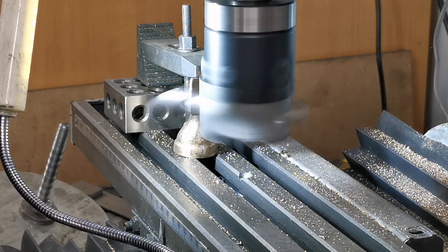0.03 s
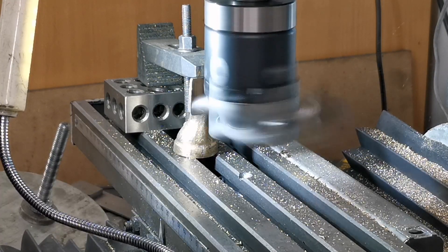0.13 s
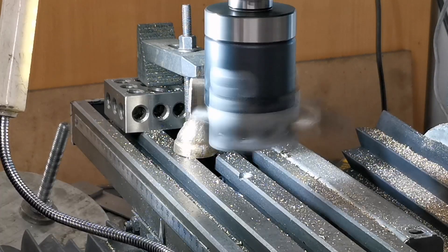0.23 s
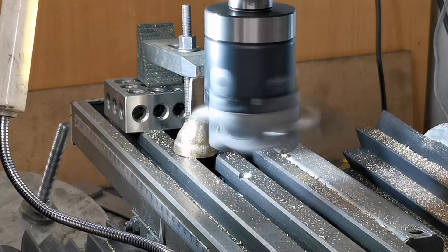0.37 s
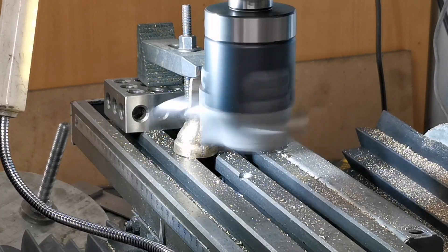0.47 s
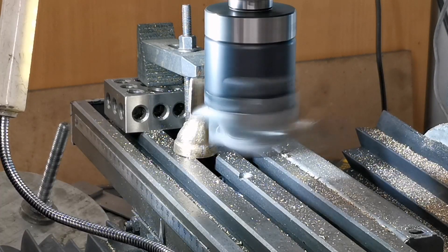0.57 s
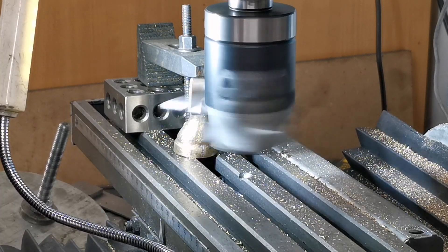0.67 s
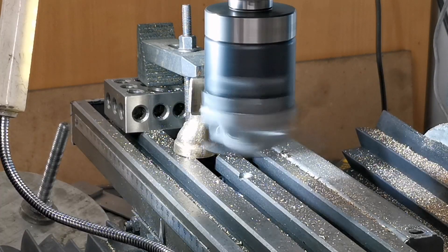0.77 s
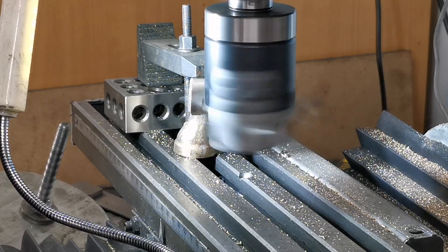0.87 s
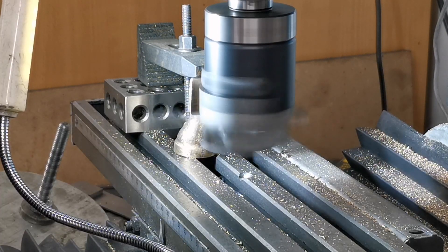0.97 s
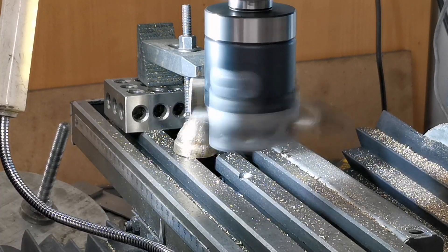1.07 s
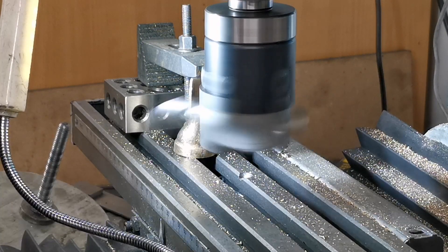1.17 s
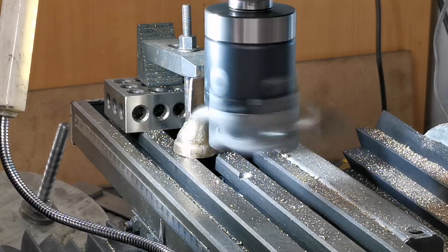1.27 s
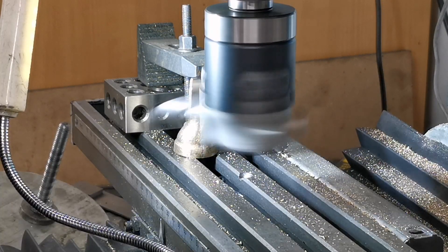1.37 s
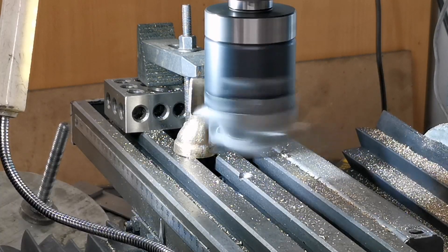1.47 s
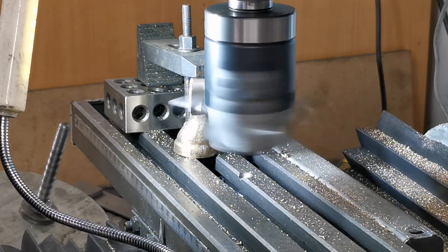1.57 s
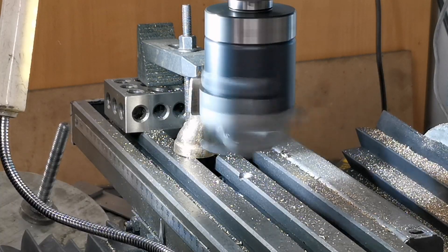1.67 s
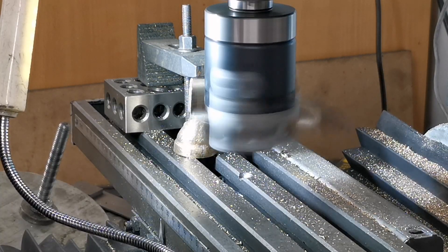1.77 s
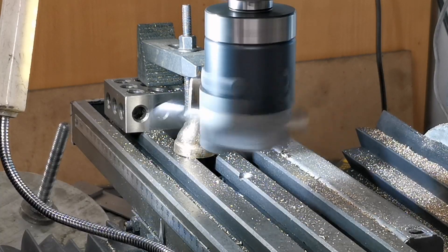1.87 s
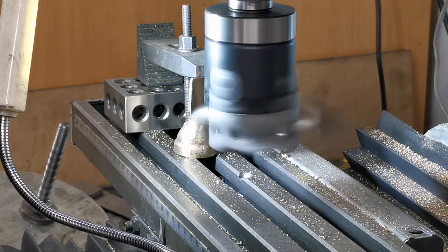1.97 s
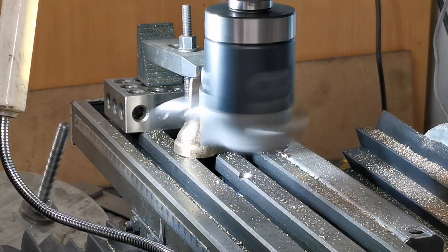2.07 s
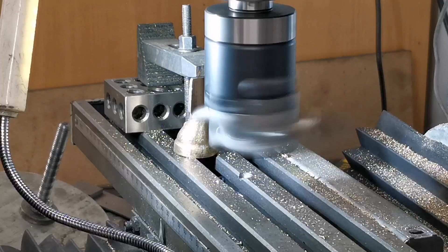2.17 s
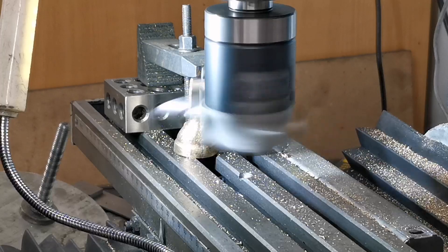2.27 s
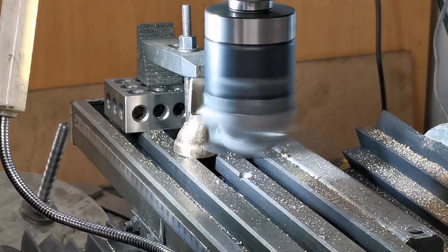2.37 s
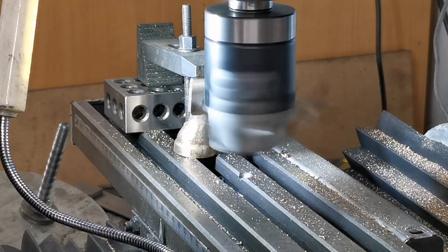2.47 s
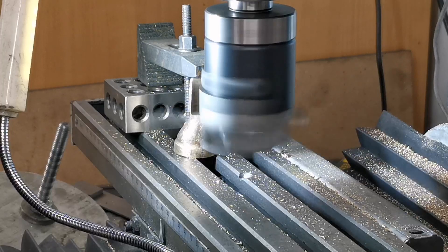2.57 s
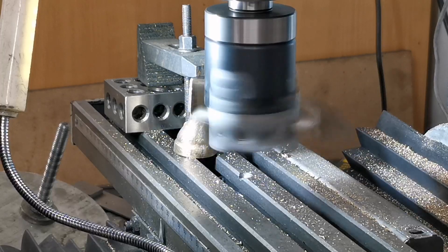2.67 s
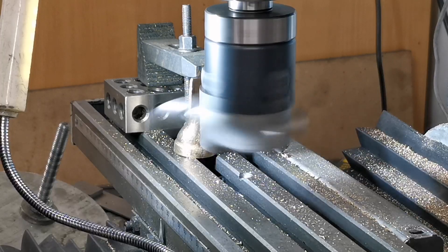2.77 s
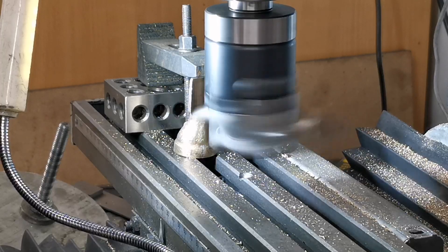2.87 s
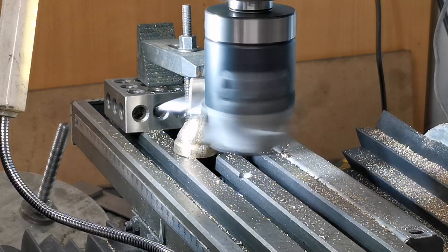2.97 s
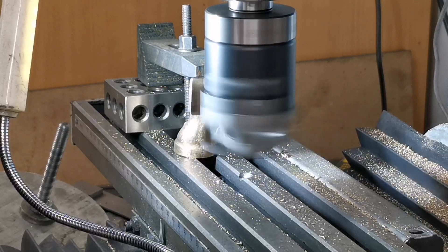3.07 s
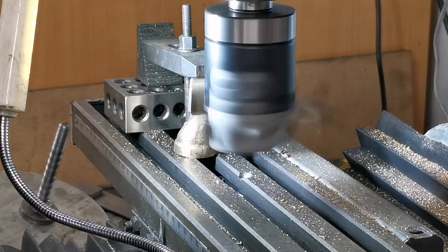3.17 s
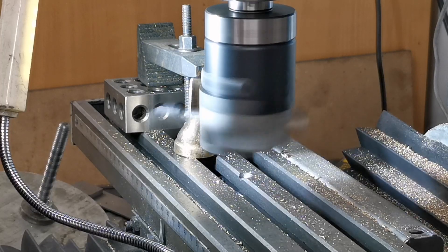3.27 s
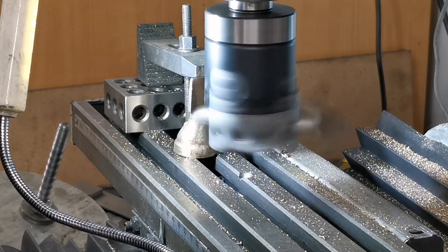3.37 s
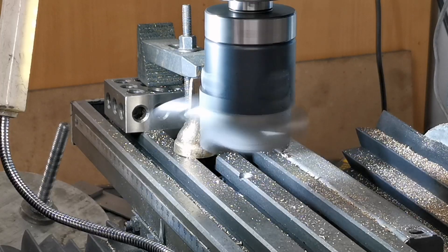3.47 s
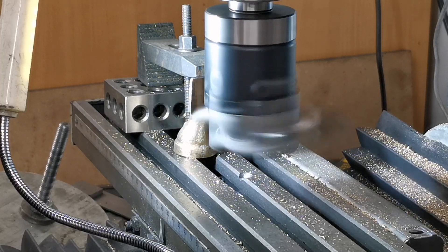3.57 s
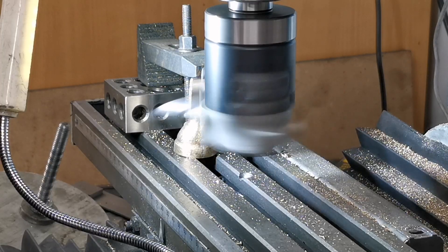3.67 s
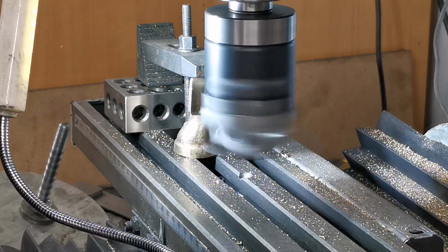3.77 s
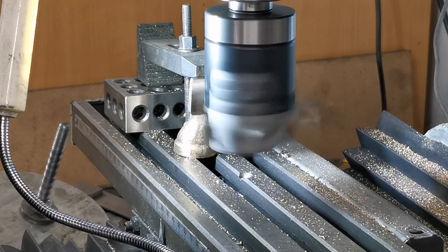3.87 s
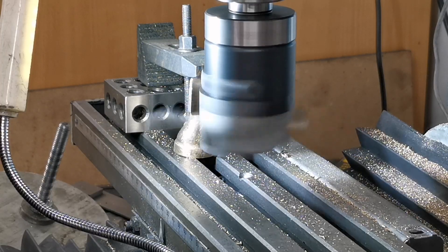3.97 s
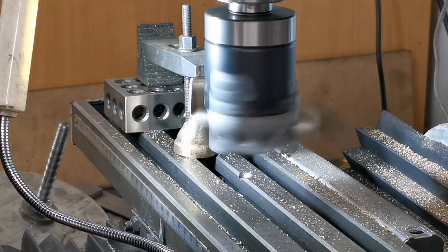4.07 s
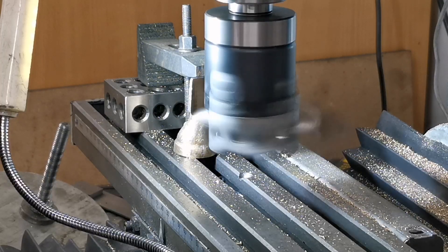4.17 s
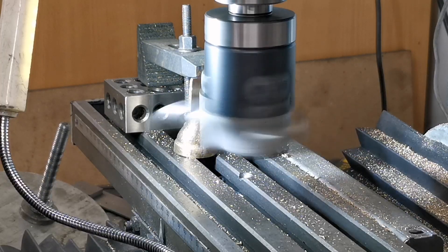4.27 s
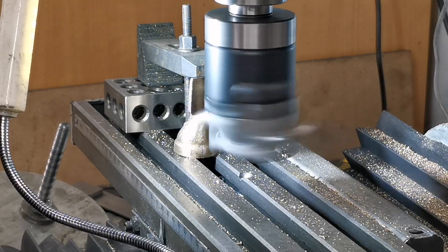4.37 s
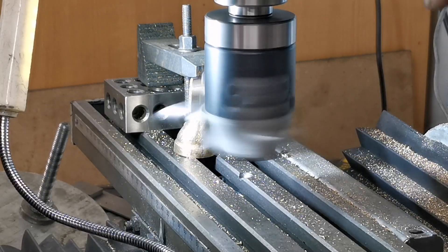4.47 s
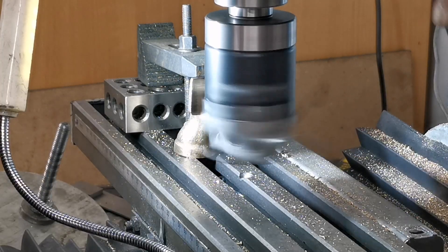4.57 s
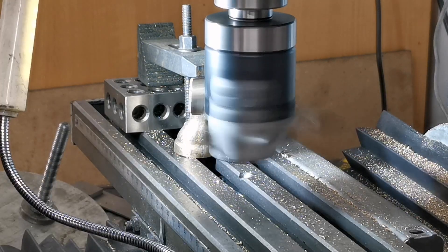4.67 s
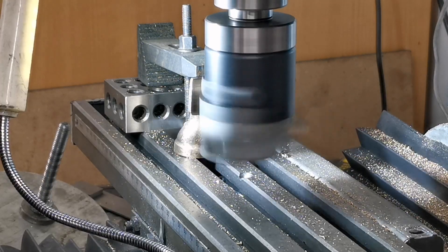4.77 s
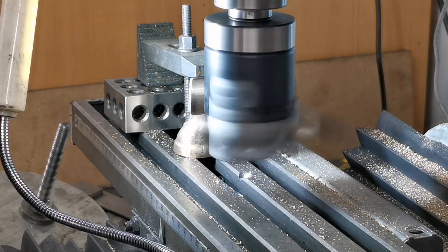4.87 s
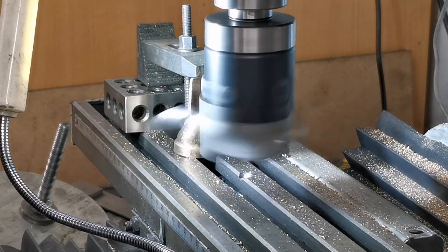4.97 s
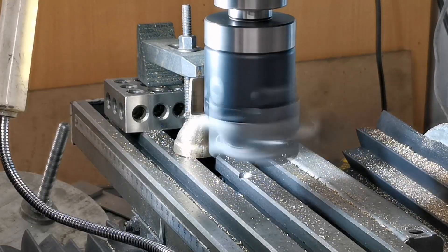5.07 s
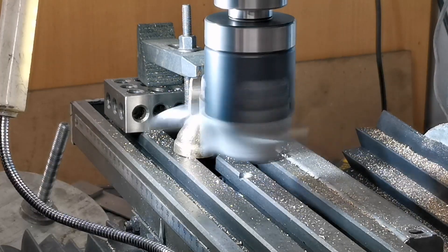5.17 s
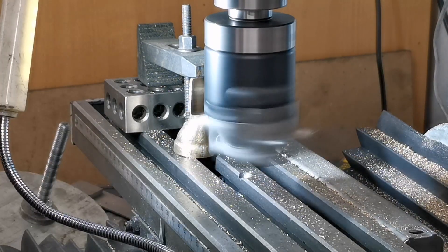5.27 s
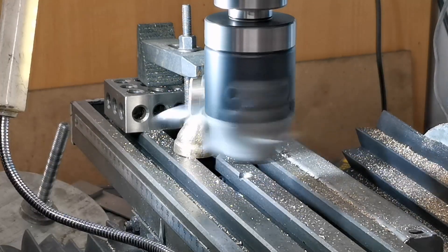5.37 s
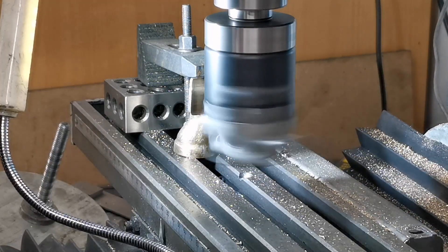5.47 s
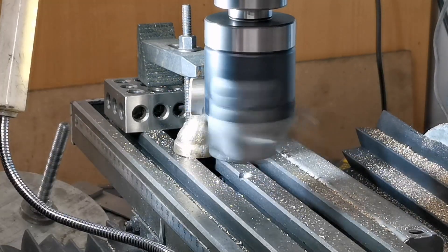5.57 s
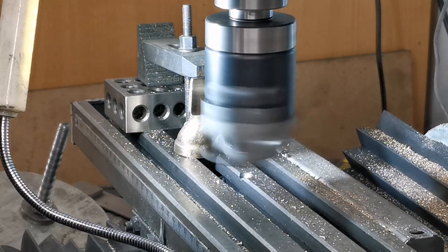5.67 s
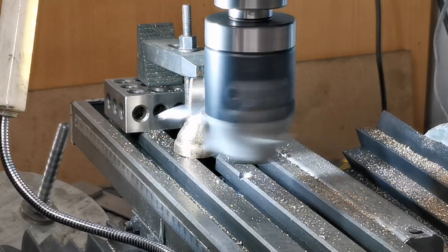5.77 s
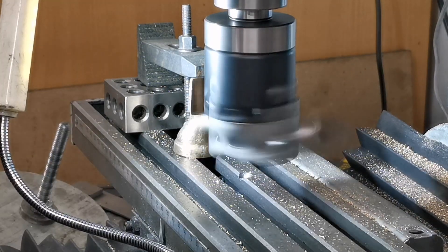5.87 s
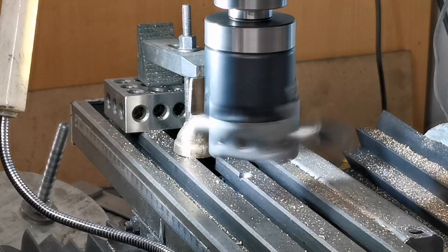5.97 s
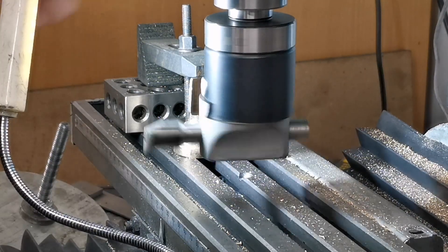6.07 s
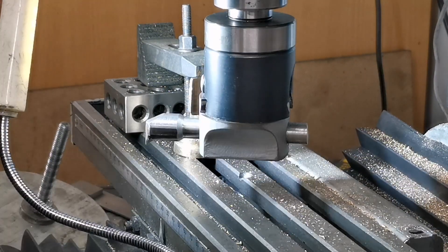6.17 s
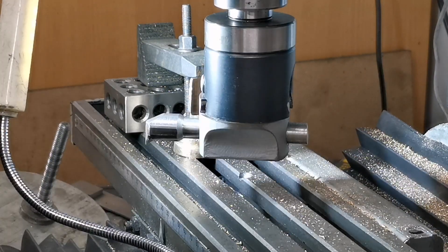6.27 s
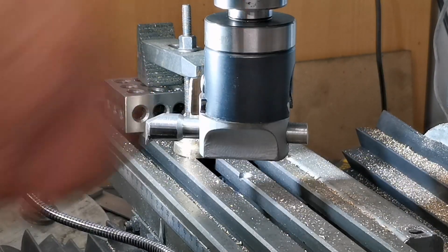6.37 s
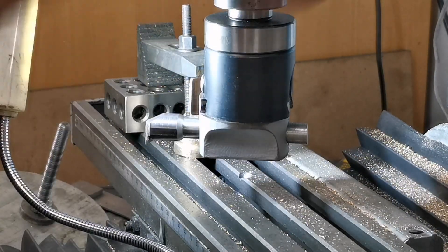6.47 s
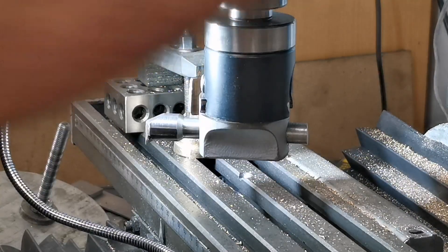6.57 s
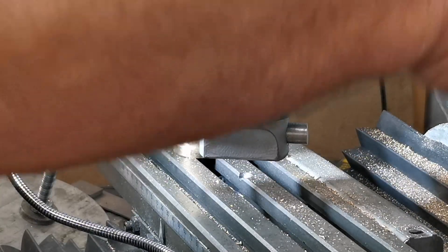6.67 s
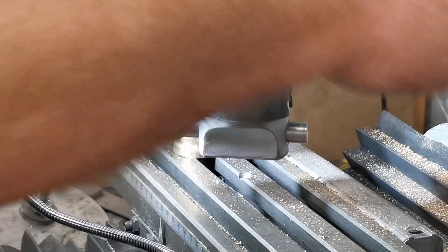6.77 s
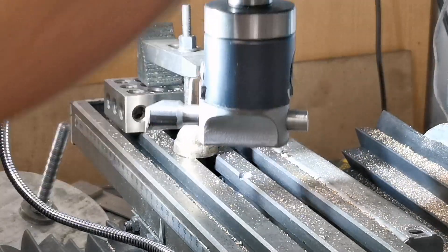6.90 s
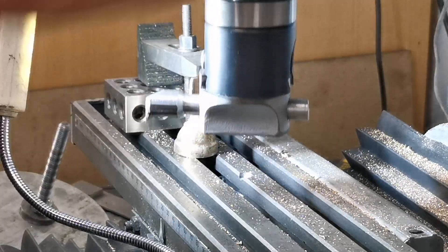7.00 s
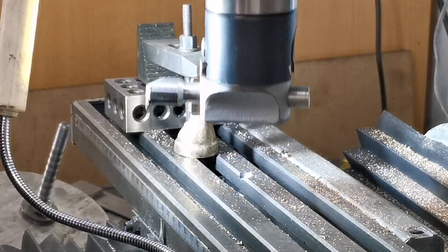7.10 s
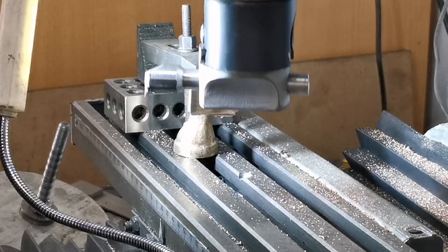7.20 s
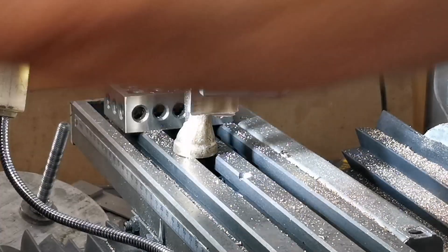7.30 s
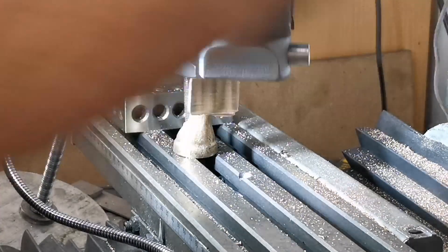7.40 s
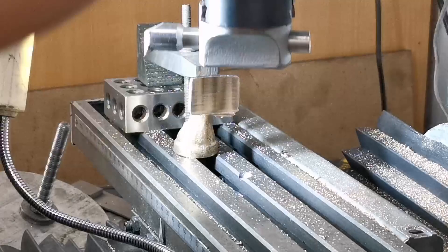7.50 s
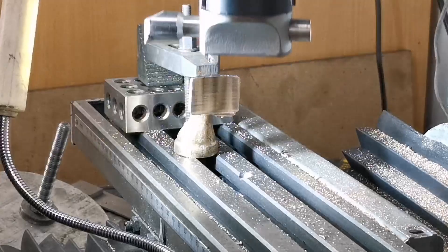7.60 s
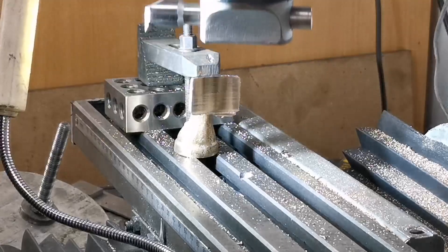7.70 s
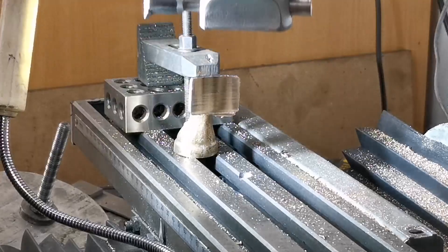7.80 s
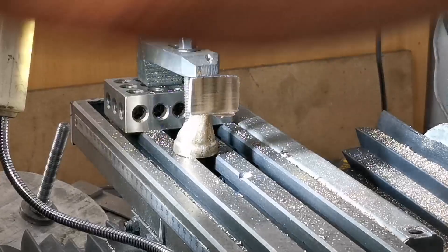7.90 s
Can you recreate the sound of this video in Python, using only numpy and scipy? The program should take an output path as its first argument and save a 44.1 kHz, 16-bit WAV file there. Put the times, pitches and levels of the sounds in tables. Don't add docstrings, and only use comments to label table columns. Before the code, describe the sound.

A milling machine heard very close in stereo, in a small workshop with short, bright reflections and quiet air. From 0 to 0.4 s a boring head takes heavy, gritty bites with ringing metal, about fifteen a second. Until about 3.7 s it settles into a steady finishing cut: each turn a short crunchy tear with clamp knock, bar ring and high tip squeal, loosening slightly over time. Bites weaken and end at 4.1 s. Then faint, uneven high ticks graze over throbbing gear rattle and thin, very high whine. At 5.73 s a switch clacks loudly; gears chatter while coasting. At 6.19 s the brake thumps, with softening knocks and a faint high squeak to 6.4 s. Near silence follows. At 6.9 s a lever slips and snaps. From 7 s to the end, near 8 s, the head rises with low rack rumble, rustle, soft sliding hiss and irregular small tooth knocks.

```python
import sys
import numpy as np
from scipy import signal
from scipy.fft import rfft, irfft, next_fast_len
from scipy.io import wavfile
from scipy.ndimage import uniform_filter1d

SR = 44100
rng = np.random.default_rng(int(sys.argv[2]) if len(sys.argv) > 2 else 0)


def generate_wav(sig):
    pcm = np.round(np.clip(np.atleast_2d(sig).T, -1, 1) * 32767).astype(np.int16)
    wavfile.write(sys.argv[1], SR, pcm)


def voltage_ratio(level):
    return 10 ** (np.asarray(level, float) / 20)


N = 350154
T = np.arange(N) / SR


def evened(x):
    return x / np.sqrt(np.mean(x ** 2) + 1e-20)


def read(points, hz):
    f, value = np.transpose(points)
    return np.interp(np.log(hz + 1), np.log(f + 1), value)


def curves(rows):
    s, *columns = np.transpose(rows)
    gate = np.clip(np.minimum(T - s[0] + 1e-3, s[-1] - T) * 50, 0, 1)
    return gate, [np.interp(T, s, c) for c in columns]


def colour(x, points):
    log_gain = np.log(voltage_ratio(read(points, abs(np.fft.fftfreq(4096, 1 / SR)))))
    taps = np.fft.ifft(np.exp(np.conj(signal.hilbert(log_gain)))).real[:2048]
    return signal.oaconvolve(x, taps / np.linalg.norm(taps))[:len(x)]


def ring(x, modes):
    out = np.zeros(len(x))
    for hz, width, db in modes:
        r = np.exp(-np.pi * abs(width) / SR)
        c = r * np.cos(2 * np.pi * hz / SR)
        level = voltage_ratio(db) * np.sqrt(2 * (1 - r * r))
        out += level * signal.lfilter([1, -c], [1, -2 * c, r * r], x)
    return out


def wobble(hz):
    return evened(ring(rng.standard_normal(N), [(0, hz, 0)]))


def bursts(times, dbs, rise, length, alike, hold=0):
    t = np.arange(4000) / SR
    out = np.zeros(N + 4000)
    noise, grit = rng.standard_normal((len(times) + 1, len(t), 2)).transpose(2, 0, 1)
    noise = noise * voltage_ratio(2.65 * evened(uniform_filter1d(grit, size=40)))
    alike = np.clip(alike, 0, 1)

    def shape(span):
        return np.minimum(t / rise, 1) ** 2 * np.exp(-np.maximum(t - rise - hold, 0) / abs(span))

    usual = shape(np.median(length))
    pattern = usual * noise[0]
    for _ in range(3):
        pattern = irfft(np.exp(1j * np.angle(rfft(pattern))))
        pattern *= usual / np.sqrt(uniform_filter1d(pattern ** 2, size=80) + 1e-12)
    pattern *= np.linalg.norm(usual) / np.linalg.norm(pattern)
    for s, db, span, fresh in zip(times, dbs, length * np.ones(len(times)), noise[1:]):
        at = max(round((s - rise / 2) * SR), 0)
        mixed = alike * pattern + np.sqrt(1 - alike ** 2) * shape(span) * fresh
        out[at:at + len(t)] += voltage_ratio(db) * mixed
    return out[:N]


def pushes(times, dbs, length):
    train = np.zeros(N)
    train[np.round(times * SR).astype(int)] = voltage_ratio(dbs)
    pulse = np.diff(np.hanning(round(length * SR) + 2)) * length * SR
    return signal.oaconvolve(train, pulse)[:N]


def blows(rows, body):
    s, db, length = np.transpose(rows)
    return colour(bursts(s, db - 12, rise=.0015, length=length, alike=0.69), body)


def whistle(hz, width):
    phase = 2 * np.pi * np.cumsum(hz + width * wobble(hz=157)) / SR
    return np.sin(phase) * voltage_ratio(3.6 * wobble(hz=25) + 4.0)


# (frequency [Hz], likeness [0-1])
LIKENESS = [(25, .55), (60, .85), (150, .995), (550, .97), (1650, .75), (4000, .2), (8000, .05)]


def diffuse(db, size):
    hz = np.fft.rfftfreq(512, 1 / SR)[:, None]
    t = np.arange(size // 128 + 5) * 128 / SR
    a, b, c, d = rng.standard_normal((len(t), len(hz), 4)).T
    same = np.clip(read(LIKENESS, hz), -1, 1)
    left = a + 1j * b
    right = same * left + np.sqrt(1 - same ** 2) * (c + 1j * d)
    z = np.array([left, right]) * voltage_ratio(db(hz, t))
    return signal.istft(z, nperseg=512, noverlap=384)[1][:, :size]


# (time [s], peak [dB])
HEAVY = [(.003, -29), (0.0216, -20), (0.0846, -20.5), (0.1495, -20.5), (0.214, -20), (0.2775, -20),
         (0.344, -20.5), (0.407, -33)]
# (time [s], peak [dB], relative tip squeal [dB])
FIRST_BITE = (.376, -26, -12.5)
# (time [s], peak [dB], relative tip squeal [dB])
BITES = [(0.44, -20.5, -10), (0.504, -21, -9), (0.567, -21, -10), (0.633, -20.5, -12.5),
         (0.697, -21, -13.5), (0.759, -21, -15), (0.825, -20.5, -10), (0.892, -21, -14.5),
         (0.958, -21, -14.5), (1.023, -20.5, -11.5), (1.088, -21.5, -14), (1.152, -21, -14),
         (1.216, -21, -13), (1.282, -21, -17), (1.345, -21.5, -14), (1.409, -22, -10), (1.475, -21.5, -16),
         (1.537, -21, -15), (1.602, -24, -14), (1.667, -23, -11.5), (1.731, -22.5, -14),
         (1.794, -23.5, -14), (1.86, -22, -14), (1.924, -23.5, -11.5), (1.989, -23.5, -13),
         (2.054, -23.5, -13.5), (2.119, -24, -9.5), (2.184, -23, -16), (2.248, -23.5, -16.5),
         (2.313, -24, -11.5), (2.377, -24, -10), (2.444, -23, -13), (2.508, -23, -15.5),
         (2.571, -22.5, -14), (2.636, -22.5, -12.5), (2.702, -23.5, -10), (2.766, -22, -12),
         (2.828, -22, -14.5), (2.892, -23.5, -11), (2.957, -22, -12), (3.019, -22, -11.5),
         (3.083, -23, -12), (3.145, -22, -15.5), (3.21, -24, -17), (3.276, -23.5, -11),
         (3.34, -23.5, -15.5), (3.404, -23.5, -13), (3.469, -23.5, -12.5), (3.534, -23.5, -13),
         (3.598, -24, -15), (3.663, -23, -15), (3.729, -25.5, -18), (3.793, -25.5, -21.5),
         (3.854, -27, -20), (3.919, -28, -15), (3.981, -27, -16.5), (4.046, -27, -20.5),
         (4.11, -31.5, -15.5)]
# (time [s], edge [dB], contact [dB], clamp ring [dB], crunch [dB])
CUT = [(.37, -2, -0.5, -34, 3), (.5, -3.5, -1, -35, 2), (1.3, -2.5, -2, -28.5, -0.5),
       (1.6, -2.5, -2, -23.5, -1), (2.3, -3.5, 0, -23.5, 0.5), (2.8, -4, -2, -25.5, -4.5),
       (3.6, -3, -3.5, -31.5, -5.5), (3.78, -3.5, -10, -21, -2.5), (3.93, -2.5, -8.5, -19, 2.5),
       (4.05, -4.5, -8.5, -18, 2.5), (4.12, -7, -16, -26, 11)]
# (table thump [dB], part knock [dB], tip squeal [dB], clamp ring [dB], crunch [dB])
HEAVY_SHARE = (-32.5, -14.5, -16, -27.5, -2.5)
LATER_SHARE = (-26, -20.5, -9.5, -2.5, 0.25)
# (bite [dB], thump [dB], knock [dB], squeal [dB])
SCATTER_DB = (.3, .9, 3, .6)


def cut():
    later_s, peak_db, squeal = np.transpose([FIRST_BITE] + list(BITES))
    at, *columns = np.transpose(CUT)
    edge, contact, clamp, crunch = (np.interp(later_s, at, c) for c in columns)
    later_db = peak_db + edge
    squeal = 0.58 * (squeal - np.median(squeal)) + 0.36 * contact
    later = np.array([contact, 0 * later_db, squeal, clamp, crunch]).T + LATER_SHARE
    heavy_s, heavy_db = np.transpose(HEAVY)
    shares = np.r_[np.tile(HEAVY_SHARE, (len(HEAVY), 1)), later].T
    luck = (rng.standard_normal((shares.shape[1], len(SCATTER_DB))) * SCATTER_DB).T
    s = np.r_[heavy_s, later_s]
    db = np.r_[heavy_db, later_db] + luck[0]
    return s, db, *(shares[:3] + luck[1:]), *shares[3:]


# (frequency [Hz], width [Hz], level [dB])
TABLE = [(145.3, 39.6, -2), (214, 28.4, -9), (290.5, 35, -8)]
CLAMP = [(463.7, 23, 7), (343, 87, -18.5)]
PART = [(786, 4.7, -29.5), (934, 23, -0.5), (1095, 51, -1.5), (1411, 19, -8), (1614, 18, -10.5),
        (1867, 120, 3.5)]
BAR = [(2290, 20, -6), (2325, 19, -12), (2372, 20, -2), (3170, 40, -2), (3320, 80, -7), (3565, 40, -9)]
TIP = [(6166, 71, -19), (7430, 28, -7), (7556, 46, -1), (7920, 38, -9), (9940, 62, -13.5),
       (11400, 150, -28)]
# (frequency [Hz], width [Hz], level [dB])
CRUNCH = [(4840, 180, -0.5), (4470, 320, -3), (3956, 130, -3.5)]
SING = [(7349, 38, -6)]
STEM = [(3166, 20, -14), (2371, 14, -22)]
# (frequency [Hz], level [dB per Hz])
SHEAR = [(120, -29.5), (200, -4.5), (1870, -2.5), (2110, -20), (2330, 8), (2850, -9.5), (3230, -6.5),
         (5200, -29), (6760, -35.5), (11400, -120)]
RUB = [(3060, -51.5), (5200, -7.5), (6900, -8.5), (7580, -0.5), (8680, -13), (12200, -17), (13300, -33),
       (16000, -12)]


def bites():
    s, db, thump, knock, squeal, clamp, crunch = cut()
    chip = bursts(s - .001, db - 4.5, rise=.004, hold=0.004, length=0.0047, alike=0.85)
    chip += bursts(s + .004, db - 14.0, rise=.006, length=0.033, alike=0.95)
    when, size = rng.random((len(s), 3, 2)).T
    late = .007 + (.032 - .007) * when
    strike_db = db - 11 - 9 * when - 7 * size
    chip += bursts((s + late).ravel(), strike_db.ravel(), rise=.001, length=.0017, alike=.1)
    knocks = bursts(s - .002, db + knock, rise=0.00407, hold=0.0014, length=0.003, alike=0.93)
    rubs = bursts(s - .001, db + squeal, rise=0.0039, hold=0.001, length=0.0086, alike=0.82)
    heavy = slice(len(HEAVY))
    chip += bursts(s[heavy] - .007, db[heavy] - 7, rise=.002, length=.004, alike=.3)
    singing = bursts(s[heavy], db[heavy] - 7.0, rise=0.0014, hold=0.013, length=0.0066, alike=0.29)
    crunches = bursts(s - .001, db - 4.5 + crunch, rise=.003, hold=0.0017, length=0.013, alike=0.15)
    push = pushes(s - .003, db + thump, length=0.0027)
    table = sum(ring(ring(push, [mode]), [mode]) for mode in TABLE)
    sound = voltage_ratio(-25.0) * table
    sound += voltage_ratio(-12.5) * ring(pushes(s - .002, db + clamp, length=0.0011), CLAMP)
    sound += voltage_ratio(-0.5) * ring(knocks, PART)
    sound += voltage_ratio(-8.5) * ring(chip, BAR)
    sound += voltage_ratio(-3.5) * ring(rubs, TIP)
    sound += voltage_ratio(-13) * ring(crunches, CRUNCH)
    sound += ring(singing, SING)
    sound += ring(pushes(s + .003, db + 3 * s, length=.00015), STEM)
    sound += voltage_ratio(-6.5) * colour(chip, SHEAR) + voltage_ratio(-2.0) * colour(rubs, RUB)
    return signal.lfilter(*signal.iirnotch(5380, 14, SR), sound)


# (time [s], gear noise [dB], drive whine [dB])
SPINDLE = [(0, -52, -59), (.4, -50.5, -72), (2, -52, -72), (4, -52.5, -75), (4.3, -52, -70), (5, -52, -63),
           (5.7, -51, -70), (5.99, -54, -68), (6.03, -56.5, -71.5), (6.07, -59, -95), (6.18, -58, -99),
           (6.35, -90, -105)]
# (time [s], frequency [Hz])
QUILL = [(0, 910), (.4, 760), (1.4, 760), (2, 820), (3.9, 795), (4.2, 770), (4.4, 638), (4.68, 850),
         (4.95, 796), (5.3, 864), (5.7, 955), (5.9, 890), (6.35, 828)]
# (frequency [Hz], level [dB per Hz])
GEARS = [(35, -52), (60, -24), (250, -18), (480, -6), (1060, -3), (1620, -2), (2200, -4), (2400, -11.5),
         (3500, -17), (8710, -11.5), (9570, -16), (12100, -27), (16000, -10.5)]
# (frequency [Hz], width [Hz], level [dB])
HOUSING = [(490, 14, -11), (544, 9.5, -3), (625, 9.6, 4.5), (742.4, 13, 3.5), (821.8, 14.5, 3),
           (861, 16, -0.5), (905.6, 17, 3.5), (1246, 24, 4.5), (1108, 28.8, -20), (1552, 27, 6.5),
           (1618, 22, 7.5), (1720, 30, -10.5), (2152, 25, 2), (9270, 45, -4)]
WHINE = [(15530, 8, -4), (15655, 4, -5.5), (15520, 18, 8), (15330, 250, 1.5)]
# (time [s], level [dB])
COAST = [(5.8, -75), (5.88, -61), (6.02, -52.5), (6.1, -61), (6.19, -74)]
# (frequency [Hz], width [Hz], level [dB])
COAST_MODES = [(534, 26, -3), (890, 30, 1), (1130, 30, -6), (2135, 26, -7)]


def spindle():
    gate, (gear_db, whine_db) = curves(SPINDLE)
    best_hz = curves(QUILL)[1][0]
    rattle = rng.standard_normal(N) * voltage_ratio(1.11 * wobble(hz=60.5) + 0.32 * np.sin(2 * np.pi * 11.0 * T))
    housing = ring(rattle, HOUSING[7:])
    for mode in HOUSING[:7]:
        favour_db = 11 * np.exp(-((mode[0] - best_hz) / 55) ** 2)
        housing += voltage_ratio(favour_db) * ring(rattle, [mode])
    gears = voltage_ratio(-3.5) * evened(housing) + voltage_ratio(-2) * evened(colour(rattle, GEARS))
    whine = evened(ring(rng.standard_normal(N), WHINE))
    coasting, (coast_db,) = curves(COAST)
    chatter = evened(ring(rattle[::-1], COAST_MODES))
    gears = gears + coasting * voltage_ratio(coast_db - gear_db) * chatter
    return gate * (voltage_ratio(gear_db) * gears + voltage_ratio(whine_db - 0.5) * whine)


# (frequency [Hz], level [dB per Hz])
AIR = [(18, -8.5), (34, -2), (55, 4.5), (93, -19), (2230, -35), (7620, -30), (11600, -36), (14000, -30.5)]


def shop_air():
    return voltage_ratio(-70) * evened(diffuse(lambda hz, t: read(AIR, hz) + 0 * t, size=N))


# (time [s], peak [dB])
GRAZES = [(4.173, -45), (4.2397, -46), (4.3037, -45), (4.3673, -40), (4.431, -48), (4.4957, -41),
          (4.562, -42), (4.626, -58), (4.691, -41.5), (4.7553, -41), (4.8188, -51), (4.8852, -61),
          (4.948, -62.5), (5.0154, -47.5), (5.0797, -49), (5.1441, -50), (5.2069, -53), (5.2703, -53),
          (5.3361, -54), (5.4025, -47), (5.468, -45), (5.5332, -50), (5.5985, -49.5), (5.6639, -60),
          (5.7352, -49), (5.8644, -52), (5.9368, -44.5), (6.011, -44.5), (6.0979, -51)]
# (frequency [Hz], width [Hz], level [dB])
GRAZED = [(9560, 22, 0), (9400, 200, -12)]
SPRUNG = [(3850, 12, -3)]


def grazes():
    s, db = np.transpose(GRAZES)
    bar_db = -47 - 8 * (s - s[0]) + 0.42 * (db + 40) - 60 * (s > 4.66)
    tick = bursts(s, db, rise=0.00071, length=0.0026, alike=0.78)
    t = T[:2000]
    hz = 9580 + (9150 - 9580) * np.exp(-t / .005)
    chirp = np.sin(2 * np.pi * np.cumsum(hz) / SR) * np.exp(-t / 0.0042) * np.minimum(t / 0.0009, 1)
    train = np.zeros(N)
    train[np.round(s * SR).astype(int)] = voltage_ratio(db - 5)
    rising = signal.oaconvolve(train, chirp)[:N]
    bar = ring(pushes(s + 0.0023, bar_db, length=.00015), SPRUNG)
    return rising + voltage_ratio(1.0) * ring(tick, GRAZED) + voltage_ratio(-9.0) * tick + bar


# (time [s], peak [dB], length [s])
LATCH = [(5.7289, -24, 0.014), (5.716, -34, 0.016)]
SWITCH = [
    (5.736, -19, 0.019),
]
# (frequency [Hz], level [dB per Hz])
LATCH_BODY = [(88, -40), (150, -11.5), (2180, -6), (2820, -6), (3640, -15), (8170, -12), (12000, -28),
              (15600, -65.5)]
SWITCH_BODY = [(47, -47), (80, -33), (1800, -5.5), (2200, -14), (4560, -9.5), (7740, -2), (14400, -31),
               (15700, -19)]


def switch():
    return blows(LATCH, LATCH_BODY) + blows(SWITCH, SWITCH_BODY)


# (time [s], peak [dB], length [s])
BRAKE = [
    (6.194, -22, 0.0095),
]
# (frequency [Hz], level [dB per Hz])
BRAKE_BODY = [(45, -31), (95, -1), (536, -5), (1080, -10.5), (3370, -7), (5500, -13), (7630, -14),
              (15700, -33)]
# (frequency [Hz], width [Hz], level [dB])
DRUM = [(517, 38, -26), (1104, 38, -19)]


def brake():
    thump = blows(BRAKE, BRAKE_BODY)
    return thump + ring(thump, DRUM)


# (time [s], frequency [Hz], level [dB])
SQUEAK = [(6.225, 7600, -76), (6.265, 7680, -59.5), (6.31, 7680, -72), (6.335, 7720, -82),
          (6.355, 7740, -72), (6.4, 7670, -79), (6.44, 7620, -89)]


def squeak():
    gate, (hz, db) = curves(SQUEAK)
    return gate * voltage_ratio(db) * (whistle(hz, width=13) + voltage_ratio(-7) * whistle(hz * 0.94, width=20))


# (time [s], peak [dB], length [s])
SETTLE = [
    (6.229, -32.5, .008),
    (6.27, -46, 0.0079),
    (6.31, -52, 0.011),
    (6.357, -55, .008),
]
# (frequency [Hz], level [dB per Hz])
SETTLE_BODY = [(60, -16), (150, 4), (500, -10), (800, -6), (1110, 0), (1500, -24), (4000, -40)]


def settle():
    return blows(SETTLE, SETTLE_BODY)


# (time [s], peak [dB], length [s])
LEVER = [
    (6.88, -34.5, 0.021),
    (6.891, -35, 0.026),
    (6.914, -19, 0.014),
]
# (frequency [Hz], level [dB per Hz])
LEVER_BODY = [(35, -40), (60, -2.5), (466, -3), (524, -5), (1060, -11.5), (5380, -10), (7630, -5.5),
              (15700, -38)]


def lever():
    return blows(LEVER, LEVER_BODY)


# (time [s], rack rumble [dB], rustle [dB])
CRANK = [(7.02, -65.5, -73), (7.19, -64.5, -82), (7.23, -58, -51), (7.3, -63, -61), (7.4, -62.5, -79),
         (7.52, -57.5, -80), (7.7, -65.5, -80), (7.77, -61.5, -68), (7.97, -59.5, -58)]
# (time [s], hiss [dB], whistle [Hz], whistle [dB])
SLIDE = [(7.02, -62, 8950, -92), (7.1, -73, 9230, -85), (7.3, -69.5, 9270, -75), (7.4, -66, 9400, -76),
         (7.52, -69.5, 9160, -86), (7.63, -63, 9050, -88), (7.7, -71, 9100, -90), (7.77, -70, 9170, -85),
         (7.97, -72, 9250, -78)]
# (frequency [Hz], level [dB per Hz])
RACK = [(35, -46.5), (60, -4), (184, -2), (238, -18), (410, -18), (1030, -41), (1630, -18), (3500, -19.5),
        (4550, -31), (7700, -120)]
RUSTLE = [(180, -20), (300, -4.5), (760, -4.5), (1190, -19), (1620, -12), (2040, -30), (5000, -32),
          (6500, -77)]
# (frequency [Hz], width [Hz], level [dB])
RACK_MODES = [(185, 23, -4), (188.5, 20, -1), (288, 45, -4), (404, 30, -5), (520, 13, -25)]


def crank():
    gate, (rumble_db, rustle_db) = curves(CRANK)
    hiss_db, whistle_hz, whistle_db = curves(SLIDE)[1]
    rub = rng.standard_normal(N) * voltage_ratio(1.9 * wobble(hz=29.5))
    rumble = voltage_ratio(-5.5) * evened(colour(rub, RACK)) + evened(ring(rub, RACK_MODES))
    rustle = evened(colour(rub, RUSTLE))
    slide_modes = [(7700, 1300, 18), (7600, 60, -10), (8000, 60, -16), (14800, 2500, 7)]
    hiss = evened(ring(rng.standard_normal(N), slide_modes))
    sound = voltage_ratio(rumble_db - 3.0) * rumble + voltage_ratio(rustle_db - 8.0) * rustle
    sound += voltage_ratio(hiss_db) * hiss + voltage_ratio(whistle_db) * whistle(whistle_hz, width=26)
    return gate * sound


# (time [s], peak [dB], length [s])
TEETH = [(7.0694, -74, 0.01), (7.127, -73, 0.01), (7.21, -58, 0.012), (7.2579, -50, 0.012),
         (7.303, -59, 0.012), (7.338, -51, 0.016), (7.4579, -51, 0.01), (7.4919, -57, 0.012),
         (7.538, -52, 0.012), (7.672, -48, 0.025), (7.7513, -43, 0.016), (7.896, -54, 0.013)]
# (frequency [Hz], level [dB per Hz])
TOOTH = [(59, -37.5), (100, -12), (422, -3), (584, -41), (2040, -7), (3600, -27), (6000, -24), (7800, -58),
         (13200, -120)]


def teeth():
    return blows(TEETH, TOOTH)


# (frequency [Hz], level [dB])
WET = [(150, 0.5), (1000, 0), (3000, -3), (8000, 3)]
# (frequency [Hz], time to fall 60 dB [s])
SHOP = [(100, 0.14), (500, 0.47), (2000, 0.4), (8000, 0.33), (16000, 0.46)]
# (frequency [Hz], level [dB])
NEAR = [(300, -28), (1000, -13), (3000, -9.5), (8000, -2.5)]


def shop(x):
    tail = diffuse(lambda hz, t: read(WET, hz) - 60 * t / read(SHOP, hz), size=SR // 2)
    tail *= np.clip(T[:SR // 2] / 0.032, 0, 1)
    tail *= voltage_ratio(-6.0) / np.linalg.norm(tail[0])
    near = diffuse(lambda hz, t: read(NEAR, hz) + 0 * t, size=4096)
    near = near * voltage_ratio(-60 * T[:4096] / 0.039)
    tail[:, :len(near[0])] += voltage_ratio(-4.5) * near / np.linalg.norm(near[0])
    return signal.fftconvolve(x[None], tail, axes=1)[:, :N]


# (frequency [Hz], left over right [dB])
LEAN = [(60, 10), (110, -2), (200, -1.5), (380, -4), (700, -2.5), (1290, -4), (2380, -1.5), (4400, -4),
        (8120, 11), (15000, -4.5)]
# (frequency [Hz], lead of left [rad])
LEAD = [(2500, 1.12), (3400, 0.49), (5860, 1.46), (6460, -1.7), (7400, -1.82), (9100, -1.4), (12400, -1.28),
        (15500, -1.5)]


def ports(x):
    size = next_fast_len(N)
    hz = np.fft.rfftfreq(size, 1 / SR)
    phase = read(LEAD, hz) * np.minimum(hz / LEAD[0][0], 1) ** 2
    half = voltage_ratio(read(LEAN, hz) / 2) * np.exp(.5j * phase)
    return irfft(rfft(x, size) * np.array([half, 1 / half]), size)[:, :N]


def scene():
    stopping = brake() + switch() + settle()
    raising = lever() + teeth()
    machine = bites() + grazes() + spindle() + stopping + raising + squeak() + crank()
    machine = signal.sosfilt(signal.butter(2, 95, "high", fs=SR, output="sos"), machine)
    return ports(machine) + shop(machine) + shop_air()


def top_cut(x):
    return signal.sosfilt(signal.butter(12, 16670, fs=SR, output="sos"), x)


# (frequency [Hz], level under a band's usual [dB])
MUTE = [(10300, -9), (11500, -5), (12700, -2), (13500, 0), (14700, -.2), (15200, -10)]


def record(dry):
    hz, t, z = signal.stft(dry, SR, nperseg=1024)
    power = (abs(z) ** 2).mean(0) + 1e-16
    band_power = power[:512].reshape(32, 16, -1).mean(1)
    band_db = 10 * np.log10(np.repeat(band_power, 16, axis=0))
    quiet_db = np.minimum(10 * np.log10(uniform_filter1d(power.sum(0), size=9)) + 50, 0)
    limit_db = uniform_filter1d(band_db, size=120) + read(MUTE, hz[:-1, None]) + quiet_db / 2
    below_treble = hz[:-1, None] < MUTE[0][0]
    z[:, :-1] *= (uniform_filter1d(band_db, size=2) > limit_db) | below_treble
    heard = signal.istft(z, SR, nperseg=1024)[1][:, :N]
    edge = signal.firwin(401, 15880, window=("kaiser", 8), fs=SR)
    mix = signal.oaconvolve(heard, edge[None], "same")
    return top_cut(mix)


dry = scene()
out = record(dry)
generate_wav(out)
```